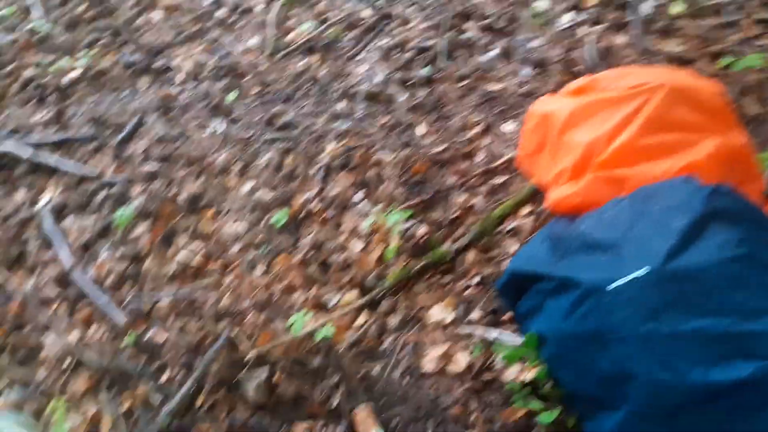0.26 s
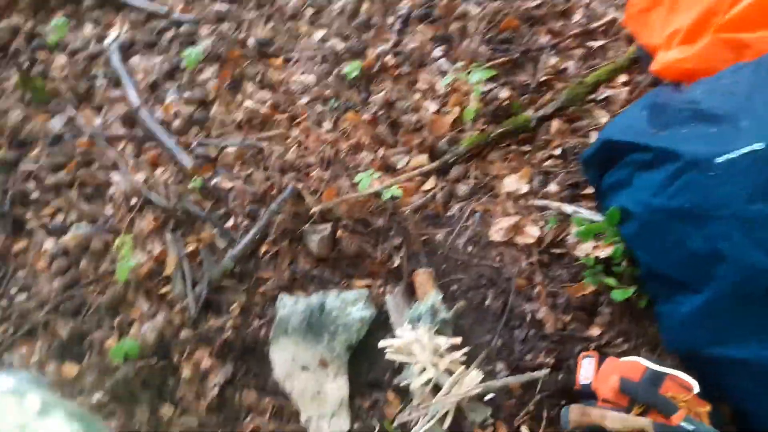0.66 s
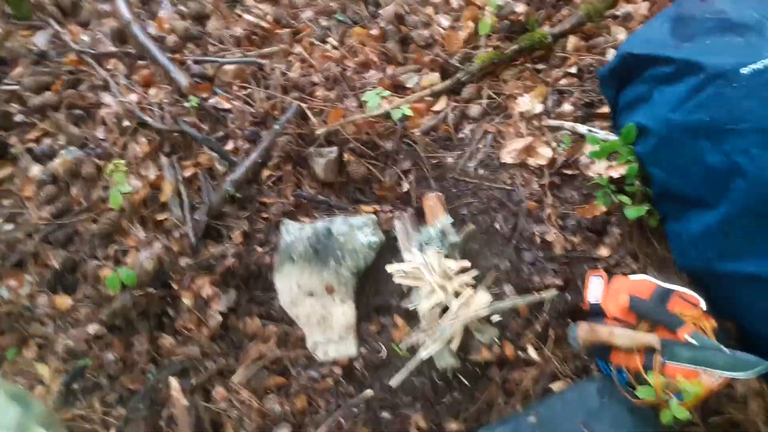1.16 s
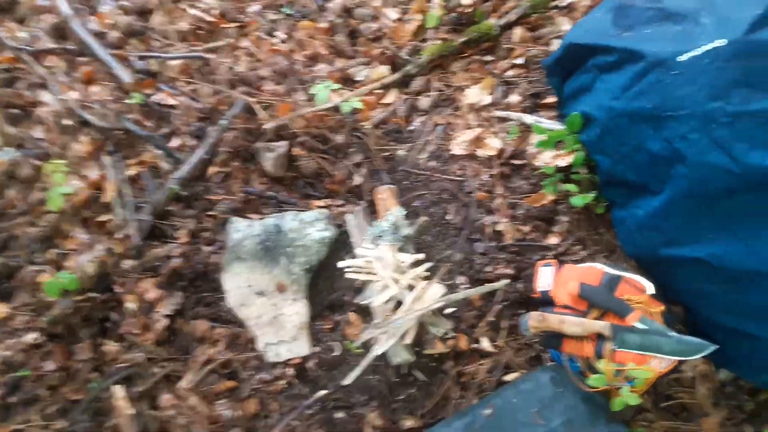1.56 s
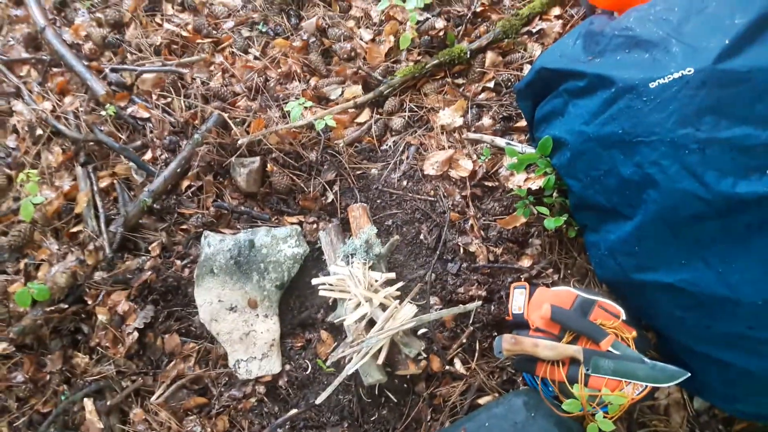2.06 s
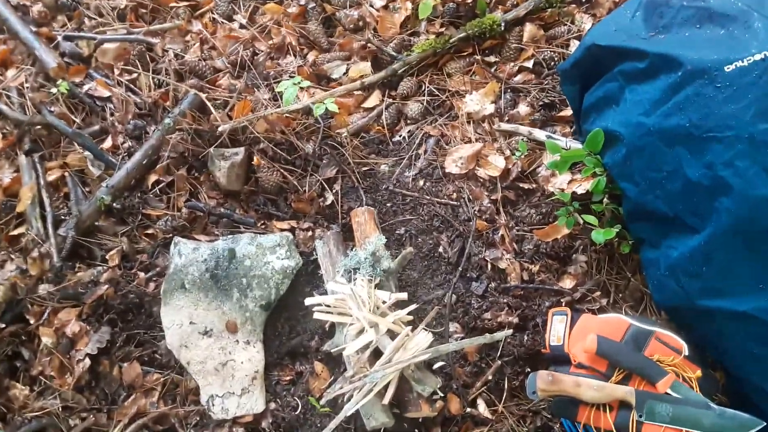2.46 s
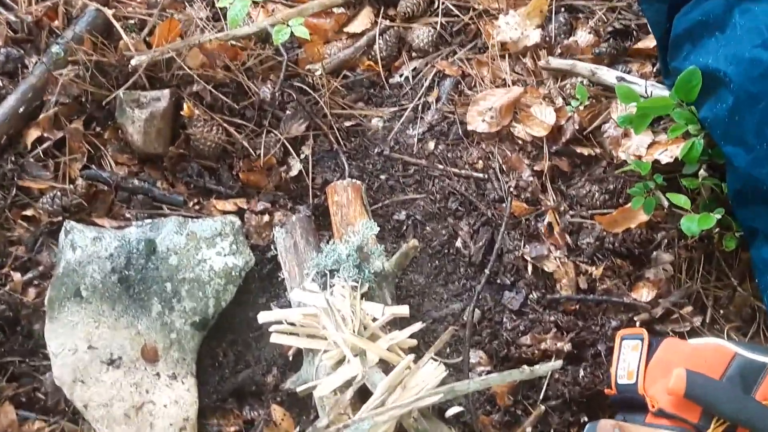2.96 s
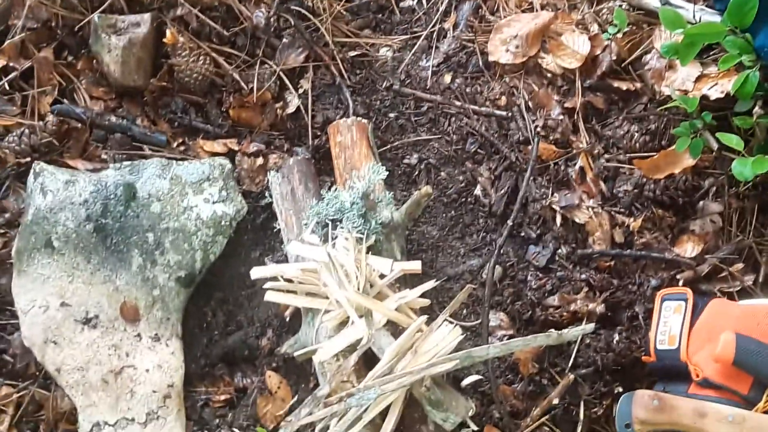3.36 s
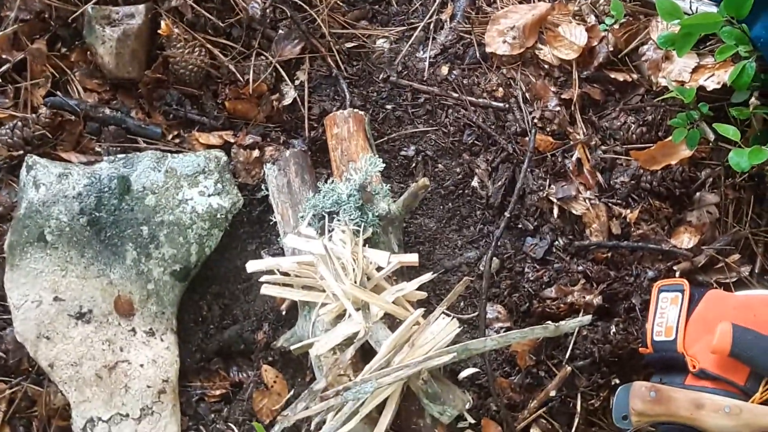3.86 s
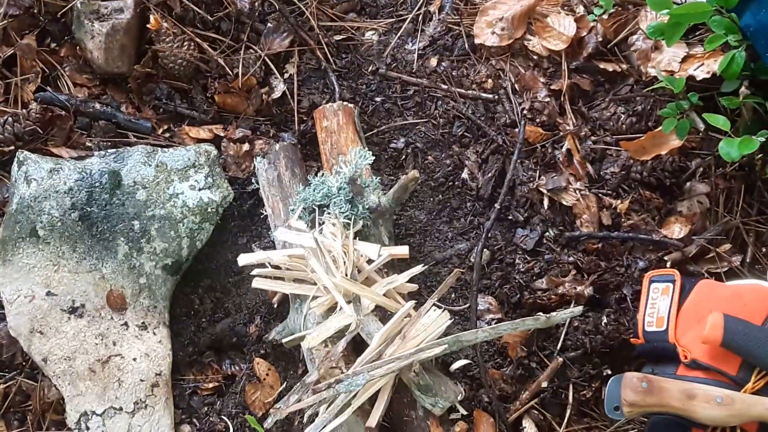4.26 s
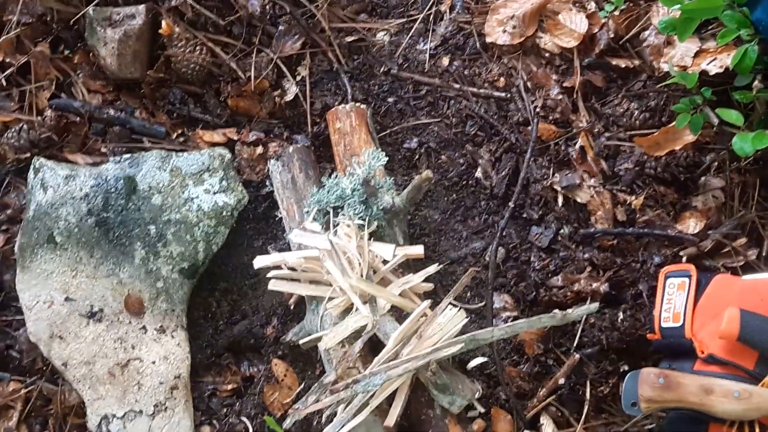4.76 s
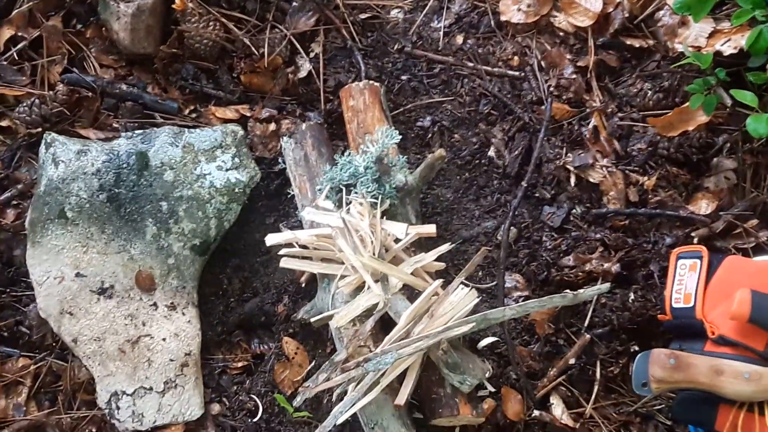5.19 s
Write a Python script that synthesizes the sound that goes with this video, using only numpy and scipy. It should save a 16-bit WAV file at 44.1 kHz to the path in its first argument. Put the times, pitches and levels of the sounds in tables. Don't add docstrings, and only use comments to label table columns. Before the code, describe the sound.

Under a stretched cloth shelter in the woods, fine drops patter and sharp fat drips smack the fabric over soft rain hiss.

```python
import sys
import numpy as np
from scipy import signal
from scipy.fft import rfft, irfft
from scipy.io import wavfile

SR = 44100
rng = np.random.default_rng(int(sys.argv[2]) if len(sys.argv) > 2 else 0)


def invert_db(x):
    u = np.asarray(x, float) / 20
    return 10 ** u


def generate_wav(sig):
    pcm = np.round(np.clip(np.atleast_2d(sig).T, -1, 1) * 32767).astype(np.int16)
    wavfile.write(sys.argv[1], SR, pcm)


N = 239286
START_S = 0.028
RING = 1600

# [t/s, far hiss level/dB, patter level/dB]
RAIN = [
    (0.03, -53.5, -59.5),
    (0.57, -44, -51),
    (3.0, -43, -43.5),
    (3.74, -44.5, -47.5),
    (4.05, -44, -44.5),
    (4.59, -46, -52),
    (5.42, -46.5, -48),
]

DRIP_TICK_HZ, DRIP_TICK_OCTAVES = 3900, 0.73


def rms_one(x):
    return x / np.sqrt(np.mean(x ** 2, axis=-1, keepdims=True) + 1e-20)


def at_hz(points, hz):
    point_hz, point_db = np.transpose(points)
    return np.interp(np.log(hz), np.log(point_hz), point_db)


def band(x, low_hz, high_hz):
    return signal.sosfilt(signal.butter(2, [low_hz, high_hz], "band", fs=SR, output="sos"), x)


def drift(rate_hz):
    r = np.exp(-80 * np.pi * rate_hz / SR)
    white = rng.standard_normal(N // 40 + 2002)
    slow = signal.lfilter([1], [1, -2 * r, r * r], white)[2000:]
    return np.interp(np.arange(N) / 40, np.arange(len(slow)), rms_one(slow))


def scatter(centre_hz, octaves, count):
    return centre_hz * 2 ** (octaves * (rng.random(count) - 0.5))


def dying(t60):
    return invert_db(-60 * np.arange(RING) / SR / t60)


def mode(hz, t60):
    return np.sin(2 * np.pi * hz[:, None] * np.arange(RING) / SR) * dying(t60)


def any_spot(count):
    luck = rng.random((count, 4)).T
    modes_hz = [280 * 2.69 ** luck[0], 800 * 3.42 ** luck[1], 2700 * 1.99 ** luck[2]]
    return modes_hz, -12.0 + 11.15 * luck[3]


def either_side(right, left):
    lag_ms = np.repeat([0.17, -0.1], [len(right), len(left)])
    return np.transpose(right + left), lag_ms + 0.06 * (rng.random(len(lag_ms)) - 0.5)


def drops(s, thump_db, slap_db, tick_db, lag_ms, modes_hz, rattle_db):
    thump, slap, tick, loose = (invert_db(db)[:, None] for db in (thump_db, slap_db, tick_db, rattle_db))
    thump_hz, slap_hz, tick_hz = modes_hz
    blow = thump * invert_db(-8.5) * mode(thump_hz, t60=0.05)
    blow = blow + slap * invert_db(10.0) * mode(slap_hz, t60=0.004)
    blow = blow + tick * invert_db(9.5) * mode(tick_hz, t60=0.0061)
    snap_hz = np.sqrt(slap_hz * tick_hz)
    blow = blow + np.sqrt(slap * tick) * invert_db(3.5) * mode(snap_hz, t60=0.0039)
    knock_hz = np.sqrt(thump_hz * slap_hz)
    blow = blow + np.sqrt(slap * thump) * invert_db(-8.0) * mode(knock_hz, t60=0.018)

    noise = rng.standard_normal((len(s), 3, RING))
    flap = thump * invert_db(2.0) * rms_one(band(noise[:, 0], 297, 573)) * dying(t60=0.032)
    out, echo = np.zeros((2, 2, N + 2 * RING))
    echo_s = 0.0068 * (1 - lag_ms ** 2)
    back = np.round(echo_s * SR).astype(int)[:, None]
    for side, sign in enumerate((1, -1)):
        own = noise[:, 1 + side]
        rattle = slap * invert_db(1.0) * rms_one(band(own, 740, 2720)) * dying(t60=0.058)
        spray = tick * invert_db(-0.3) * rms_one(band(own, 1510, 8000)) * dying(t60=0.093)
        crack = tick * invert_db(8.5) * rms_one(band(own, 5470, 10000)) * dying(t60=0.0032)
        start = np.round((s + sign * lag_ms / 2000) * SR).astype(int)[:, None]
        at = start + np.arange(RING)
        np.add.at(out[side], at, blow + crack + loose * (flap + rattle + spray))
        np.add.at(echo[side], at + back, blow)
    return (out + invert_db(-15) * band(echo, 155, 7600))[:, :N]


def drips(s, thump_db, slap_db, tick_db, lag_ms, modes_hz):
    rattle_db = -6 - 0.49 * (slap_db + 27.5)
    return drops(s, thump_db, slap_db, tick_db, lag_ms, modes_hz, np.minimum(rattle_db, 0))


def far_rain(patchy_db):
    # [f/Hz, level per Hz/dB]
    hiss_colour = [(25, 8), (70, 5), (130, -62), (330, -1.5), (700, -11), (2000, -4.5), (5000, -10.5),
                   (10000, -5.5), (16000, -22)]
    # [f/Hz, likeness 0..1]
    likeness = [(60, 0), (180, 0.89), (550, 0.74), (1650, 0), (4970, 0.00006), (15000, 0.01)]
    out, together = 0, drift(30.0)
    edges = 25 * 2 ** np.arange(0, 9.6, 0.33)
    white = rng.standard_normal((2, 2, N))
    for k, (low, high) in enumerate(zip(edges, edges[1:])):
        mid, side = band(white[k % 2], low, high)
        hz = np.sqrt(low * high)
        alike = np.clip(at_hz(likeness, hz), 0, 1)
        flicker_db = patchy_db * (1.28 * together + drift(6.4))
        gain = invert_db(at_hz(hiss_colour, hz) + flicker_db)
        out = out + gain * (np.sqrt(1 + alike) * mid + np.sqrt(1 - alike) * side * [[1], [-1]])
    level_db = np.interp(np.arange(N) / SR, *np.transpose(RAIN)[:2])
    return invert_db(level_db + 2.0) * rms_one(out)


def patter(per_second):
    luck = rng.random((int(per_second * N / SR), 6))
    s = START_S + luck[:, 0] * (N / SR - START_S)
    size_db = np.interp(s, *np.transpose(RAIN)[[0, 2]]) - 1.87 * np.log(np.maximum(luck[:, 1], 0.04))
    thump_db = size_db - 14.0 + 8.1 * (luck[:, 2] - 0.5)
    slap_db = size_db - 0.5 + 6.7 * (luck[:, 3] - 0.5)
    tick_db = size_db - 5.0 + 4.4 * (luck[:, 4] - 0.5)
    lag_ms = 0.66 * (luck[:, 5] - 0.4)
    return drops(s, thump_db, slap_db, tick_db, lag_ms, *any_spot(count=len(s)))


def large_drops():
    # [t/s, thump level/dB, slap level/dB, tick level/dB]
    right_drops = [(0.0764, -48, -38, -49), (0.4969, -34, -32, -59), (0.8715, -30, -37, -48),
                   (0.9598, -60, -31, -63), (1.116, -65, -33.5, -61), (1.279, -38, -31.5, -45),
                   (1.3855, -40, -33.1, -33), (1.8554, -34, -34, -36), (2.1412, -52.6, -31, -36),
                   (2.269, -30, -33, -29), (2.4697, -49, -31.5, -35), (2.803, -42, -32, -50),
                   (2.9887, -31, -37, -32), (3.0247, -30.5, -37, -31), (3.044, -53, -41, -36),
                   (3.1895, -39, -32, -40), (3.291, -28, -45, -54), (3.3076, -41, -34, -36),
                   (3.344, -54, -28, -42), (3.5046, -38, -34, -48), (3.6019, -31, -30, -38),
                   (4.008, -45, -33, -53), (4.1187, -43, -32, -46), (4.2194, -32, -32.5, -43),
                   (4.294, -41.5, -36, -43), (4.5023, -43, -34, -39), (4.867, -62, -34, -64),
                   (5.0848, -37, -31.5, -33.5), (5.1663, -29, -36, -54), (5.4016, -46, -29.5, -32)]
    # [t/s, thump level/dB, slap level/dB, tick level/dB]
    left_drops = [(0.0573, -66, -42.5, -72), (0.1002, -39.5, -43, -46), (0.2444, -70, -51, -49),
                  (0.5606, -51, -31, -44), (0.7331, -57, -41, -53), (1.1914, -58, -47, -36),
                  (1.6113, -40, -40, -51), (2.0475, -49.8, -47, -47), (2.3354, -44, -31.5, -33),
                  (2.449, -51, -36, -51), (2.5021, -56, -31.5, -49), (2.7196, -42, -26, -41),
                  (2.907, -42, -32, -39), (2.942, -40, -40, -37), (2.9832, -39, -33, -43),
                  (3.0727, -40, -36, -43), (3.0843, -49, -45, -46), (3.355, -48, -31, -38),
                  (3.389, -55, -31.5, -31), (3.6926, -30.5, -31, -35.5), (3.754, -34, -32, -33),
                  (3.8176, -52.9, -38, -32), (3.863, -57, -34, -33), (4.1794, -41, -30.5, -54),
                  (4.7533, -58, -36, -55), (4.7766, -63, -34.5, -37), (4.95, -57, -33, -34.5),
                  (4.977, -30, -38, -30), (5.04, -54, -34, -32.5), (5.1299, -54, -38, -40.5)]
    columns, lag_ms = either_side(right_drops, left_drops)
    return drops(*columns, lag_ms, *any_spot(count=len(lag_ms)))


def overhead():
    # [t/s, slap level/dB, slap f/Hz, tick level/dB, tick f/Hz]
    overhead_drips = [
        (1.5162, -27, 1610, -28.5, 3800),
        (1.563, -18, 1080, -29, 4370),
        (1.623, -19.5, 1530, -29, 3200),
        (2.276, -24.5, 1170, -33, 6500),
        (2.736, -26.5, 930, -24, 3940),
        (2.774, -21, 710, -24.5, 4210),
        (3.4808, -31.5, 1920, -31.5, 5970),
        (4.6, -31.5, 2020, -38, 3700),
        (4.8966, -22.5, 754, -27.5, 2770),
    ]
    s, slap_db, slap_hz, tick_db, tick_hz = np.transpose(overhead_drips)
    thump_hz = scatter(382, octaves=0.43, count=len(s))
    lag_ms = np.full(len(s), 0.03)
    return drips(s, slap_db - 3, slap_db, tick_db, lag_ms, [thump_hz, slap_hz, tick_hz])


def slaps():
    # [t/s, thump level/dB, slap level/dB, tick level/dB, slap f/Hz]
    right_slaps = [(0.3961, -30.5, -22, -32, 1550), (0.6183, -40, -31, -41, 1220),
                   (1.3597, -27.5, -26, -30.5, 740), (1.3905, -48, -31.5, -43, 1930),
                   (1.4258, -22, -13.5, -46, 1490), (1.7429, -28, -33, -38, 2360),
                   (1.7904, -32, -27, -45, 1890), (1.9275, -33, -26.5, -25, 1330),
                   (2.1492, -31, -33, -35, 1850), (2.225, -48.8, -32, -49, 1360),
                   (2.727, -53, -33, -32, 2370), (3.0532, -40, -23, -28, 2000),
                   (3.5646, -34, -34, -54, 1410), (3.5272, -52, -30, -29.5, 2150),
                   (3.5852, -27, -25.5, -29.5, 1150), (4.0253, -61, -35, -31, 1150),
                   (4.2629, -30, -30, -34, 1090), (4.4207, -17.5, -16, -25.5, 1220),
                   (4.5533, -26, -26.5, -32, 1250), (4.0345, -51, -32, -35, 1400),
                   (4.9189, -32, -35, -41, 1440), (4.992, -43, -27, -34, 1330)]
    # [t/s, thump level/dB, slap level/dB, tick level/dB, slap f/Hz]
    left_slaps = [
        (1.2076, -27, -19, -37, 1620),
        (2.04, -38, -32, -34, 1390),
        (2.2887, -54, -26.5, -25.5, 1290),
        (2.5733, -36, -27, -56, 1210),
        (2.6732, -47, -20, -25.5, 1610),
        (2.6988, -54, -38, -34, 2530),
        (2.8722, -24.5, -24.5, -28, 2500),
        (3.422, -33, -33.5, -35, 1570),
        (3.9033, -41, -19.5, -48, 1590),
        (5.2895, -50, -20.5, -33.5, 1910),
    ]
    (s, thump_db, slap_db, tick_db, slap_hz), lag_ms = either_side(right_slaps, left_slaps)
    thump_hz = scatter(442, octaves=0.73, count=len(s))
    tick_hz = scatter(4180, octaves=0.28, count=len(s)) * 2 ** (0.05 * (tick_db + 24.0))
    return drips(s, thump_db, slap_db, tick_db, lag_ms, [thump_hz, slap_hz, tick_hz])


def thuds():
    # [t/s, thump level/dB, thump f/Hz, slap level/dB, lag of left behind right/ms]
    slack_drips = [(0.5192, -29, 338, -38, 0.23), (0.8179, -28.5, 320, -32.5, 0.34),
                   (0.8874, -36, 590, -35, 0.29), (1.905, -29, 637, -31.5, 0.36),
                   (2.1036, -29.5, 458, -32.5, 0.16), (2.1798, -13, 365, -22.5, 0.26),
                   (2.1955, -34, 458, -33.5, 0.22), (2.2094, -24.5, 426, -32, 0.33),
                   (2.2504, -29.5, 434, -34.5, 0.24), (2.4062, -22, 364, -27.5, -0.15),
                   (2.828, -15, 340, -16.5, -0.37), (2.9185, -27.5, 332, -26.5, -0.27),
                   (3.1577, -26.5, 336, -28.5, 0.091), (3.329, -29, 654, -35, 0.35),
                   (3.5454, -28.5, 400, -34, 0.041), (3.7745, -28, 484, -31.5, 0.16),
                   (3.8311, -14, 530, -29, 0.11), (3.8496, -26, 665, -29, 0.34),
                   (3.9319, -21, 467, -55, -0.045), (4.0962, -31, 348, -43, 0.37),
                   (4.1326, -22, 357, -29, 0.17), (4.307, -28.5, 670, -31, 0.076),
                   (5.019, -31.5, 327, -32, 0.16), (5.3324, -25.5, 540, -30.5, 0.3)]
    s, thump_db, thump_hz, slap_db, lag_ms = np.transpose(slack_drips)
    slap_hz = scatter(1250, octaves=0.99, count=len(s))
    tick_hz = scatter(DRIP_TICK_HZ, DRIP_TICK_OCTAVES, count=len(s))
    return drips(s, thump_db, slap_db, slap_db - 2.5, lag_ms, [thump_hz, slap_hz, tick_hz])


def scene():
    rain = far_rain(patchy_db=1.5) + patter(per_second=420)
    return rain + large_drops() + overhead() + slaps() + thuds()


def roll_off(x):
    return signal.sosfilt(signal.butter(12, 16990, fs=SR, output="sos"), x)


def record(dry):
    # [f/Hz, level/dB]
    mic_colour = [(5000, 0), (6300, -3.5), (7300, -9.5), (8500, -21), (9600, -20.5), (11000, -15.5),
                  (12300, -8), (15500, -3.5)]
    # [f/Hz, left minus right level/dB]
    port_difference = [(60, -0.5), (150, 1), (380, -0.5), (950, 0.0), (2380, -0.5), (5980, -4.5),
                       (15000, 0.5)]
    hz = np.maximum(np.fft.rfftfreq(N, 1 / SR), 1)
    colour_db = at_hz(mic_colour, hz) + at_hz(port_difference, hz) * np.array([[0.5], [-0.5]])
    x = irfft(rfft(dry) * invert_db(colour_db) * (hz < 15850), N)
    bass_cut = signal.butter(4, 135, "high", fs=SR, output="sos")
    x = signal.sosfilt(bass_cut, x) + invert_db(-33.0) * band(x, 14, 61)
    rumble = [[1, 0.67], [1, -0.65]] @ rng.standard_normal((2, N))
    x = x + invert_db(-90.0) * rms_one(band(rumble, 11, 67)) - 0.0005
    x = x * np.clip((np.arange(N) / SR - START_S) / 0.022, 0, 1)
    return roll_off(x)


dry = scene()
out = record(dry)
generate_wav(out)
```